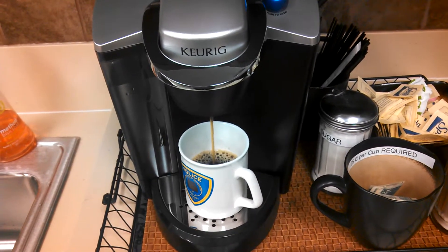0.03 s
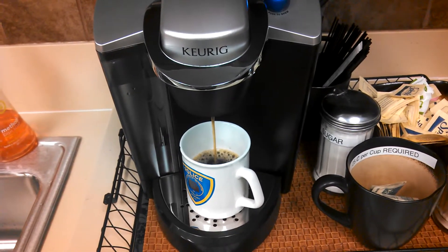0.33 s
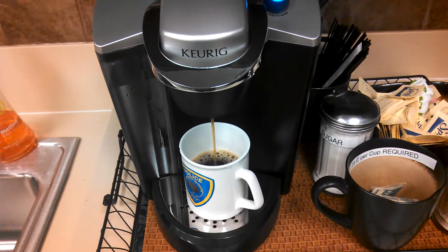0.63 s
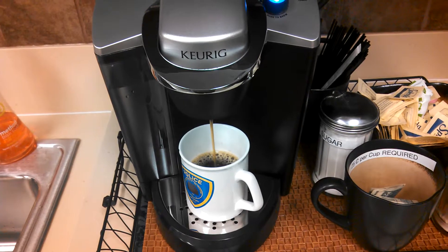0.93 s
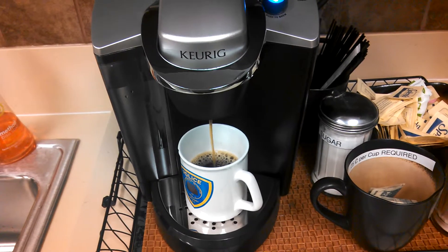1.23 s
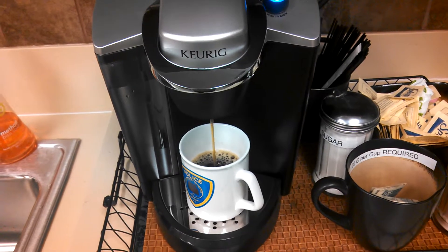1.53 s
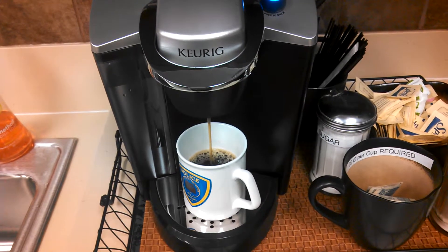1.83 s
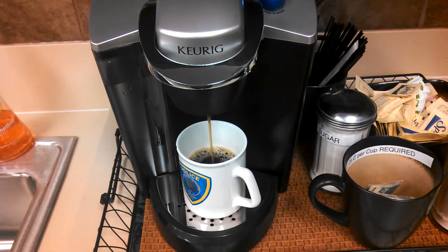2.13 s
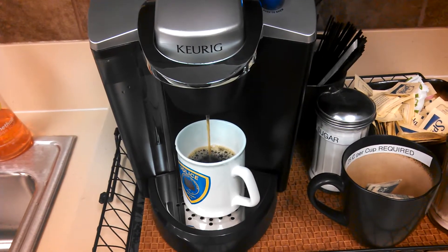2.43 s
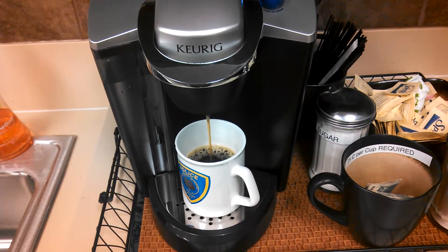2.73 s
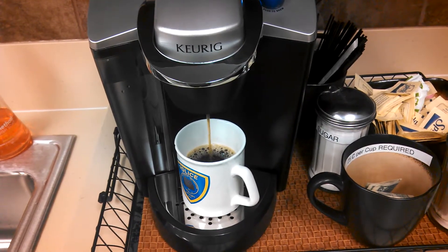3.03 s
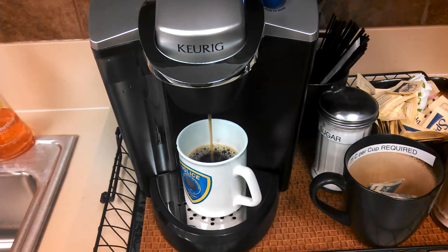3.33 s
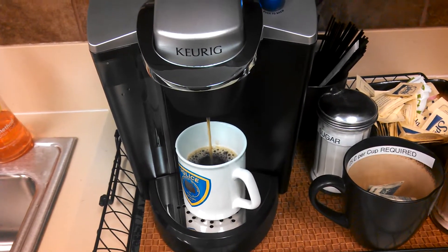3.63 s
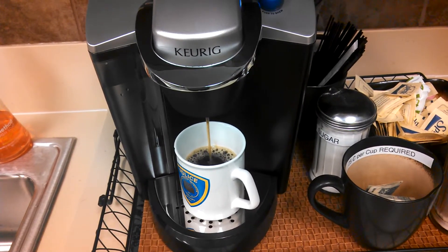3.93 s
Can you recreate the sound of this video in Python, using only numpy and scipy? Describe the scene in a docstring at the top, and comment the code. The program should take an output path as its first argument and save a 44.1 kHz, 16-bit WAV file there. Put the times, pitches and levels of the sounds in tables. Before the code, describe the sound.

Coffee dribbles into a partly filled mug, heard close up on a kitchen counter. Small bubbles plop and fizz throughout, turning briefly deeper late in the pour, over the coffee maker's low hum and a dull room rush.

```python
"""On a kitchen counter, a thin stream of coffee falls from a brewer into a half-full mug.
Drops trap air bubbles, which oscillate freely: large ones plop, small ones plink, and late in the
pour deeper ones gurgle. Impacts excite the air modes of the mug; the foam fizzes and bursts in
sharp ticks. The brewer's recess and the kitchen reflect these sounds. Underneath, the machine
hums over the dull rush of the room."""
import sys
import numpy as np
from scipy import signal
from scipy.fft import rfft, irfft, next_fast_len
from scipy.io import wavfile

SR = 44100
rng = np.random.default_rng(int(sys.argv[2]) if len(sys.argv) > 2 else 0)


def log_audio(samples):
    """Write samples as a 16-bit WAV file to the path given in sys.argv[1]."""
    # one column per channel
    frames = np.atleast_2d(samples).T
    # limit to full scale, then quantise
    limited = np.clip(frames, -1, 1)
    pcm = np.round(limited * 32767).astype(np.int16)
    wavfile.write(sys.argv[1], SR, pcm)


N = 176400
TIME = np.arange(N) / SR


def from_db(db):
    """Amplitude grows tenfold for every 20 dB."""
    return 10 ** (np.asarray(db) / 20)


def unit_rms(x):
    """Normalisation to unit mean power."""
    return x / np.sqrt(np.mean(x ** 2) + 1e-20)


def drift(hz):
    """Low-passed noise gives a slow random fluctuation of rms 1."""
    step = 40  # samples between values
    pole = np.exp(-2 * np.pi * hz * step / SR)
    slow = signal.lfilter([1], [1, -2 * pole, pole * pole], rng.standard_normal(N // step + 2002))[2000:]
    return np.interp(np.arange(N) / step, np.arange(len(slow)), unit_rms(slow))


def colour(x, curve, size=2048):
    """Minimum-phase filtering: folding the cepstrum makes a gain curve (f/Hz, gain/dB) causal."""
    hz, db = np.transpose(curve)
    grid_hz = np.maximum(np.arange(size + 1) * SR / (2 * size), 1)
    gain = from_db(np.interp(np.log(grid_hz), np.log(hz), db))
    cepstrum = irfft(np.log(gain))
    cepstrum[1:size] *= 2
    cepstrum[size + 1:] = 0
    return signal.fftconvolve(x, irfft(np.exp(rfft(cepstrum))))[:len(x)]


def noise(curve):
    """Filtered white noise takes the spectrum of its filter; the rms is 1."""
    return unit_rms(colour(rng.standard_normal(N + SR), curve)[SR:])


def add(out, start_s, sound):
    """Superposition: a short sound adds to those already present."""
    i = int(np.clip(start_s * SR, 0, N - 1))
    out[i:i + len(sound)] += sound[:N - i]


# Phase lead of the left side over the right: f/Hz, phase/rad
LEFT_LEAD = [(0, -2.8), (300, -1.1), (570, -2.4), (800, -.6), (1400, 0), (2100, 1.1), (2500, 3),
             (2800, 3.15), (13900, 28.3), (14600, 31.4)]

def left_of(x):
    """Phase difference: each frequency reaches the left side with its own shift."""
    size = next_fast_len(N + SR)
    spectrum = rfft(x, size)
    lead = np.interp(np.arange(len(spectrum)) * SR / size, *np.transpose(LEFT_LEAD))
    return irfft(spectrum * np.exp(1j * lead), size)[:N]


# Tones of the machine: f/Hz, level/dB, wavering share (0-1)
HUM_TONES = [(60.2, -52.5, 0.14), (119.2, -42.5, 0.07), (256, -50.5, 1), (316.7, -48, 0.89),
             (414.2, -54.5, 0.86), (582.4, -47.5, 0.99), (707.3, -55, 0.87)]

def hum(left_db=-3, swell_hz=326):
    """Forced vibration: mains and pump tones waver in level and phase; the middle ones swell once."""
    out = np.zeros((2, N))
    swell_db = 9 * np.exp(-((TIME - 2.27) / 0.19) ** 2)  # greatest at 2.27 s
    for hz, db, waver in HUM_TONES:
        lead = np.interp(hz, *np.transpose(LEFT_LEAD))
        modulation = np.sqrt(2 * (1 - waver ** 2)) + waver * (drift(9.6) + 1j * drift(6.5))
        level = db + swell_db * np.exp(-(2 * np.log2(hz / swell_hz)) ** 2)
        tone = from_db(level) * modulation * np.exp(2j * np.pi * (hz * TIME + rng.random()))
        out += np.real([from_db(left_db) * tone * np.exp(1j * lead), tone])
    return out


# Spectral density of the room's air noise: f/Hz, relative level/dB
RUSH_SPECTRUM = [(25, -31), (45, -9.5), (170, -0.5), (310, -3.5), (460, -6), (520, -9.5), (620, -6),
                 (800, -17), (3000, -44)]

def rush(level_db=-38.5, left_db=-3, coherence=0.85):
    """Partial coherence: the two sides share most of the kitchen's dull air noise."""
    right = noise(RUSH_SPECTRUM)
    left = coherence * left_of(right) + np.sqrt(1 - coherence ** 2) * noise(RUSH_SPECTRUM)
    return from_db(level_db) * np.array([from_db(left_db) * left, right])


# Vigour of the small splashing between the drops: t/s, relative level/dB
SPLASH_VIGOUR = [(0, -1), (.66, -5.5), (1.1, -1.5), (1.52, -7.5), (1.97, -3), (2.45, -7.5), (2.9, -1.5),
                 (3.2, -2), (3.65, -6.5), (4, -0.5)]

def splashing_db(times):
    """Amplitude envelope common to the faint sounds of the pour."""
    return np.interp(times, *np.transpose(SPLASH_VIGOUR))


# Spectral density of the foam's fizz: f/Hz, relative level/dB
FIZZ_SPECTRUM = [(500, -6), (1000, 19.5), (1900, 12.5), (2400, 10.5), (4400, 3.5), (5900, -1), (7500, -3),
                 (15400, -2), (16100, -33)]

def fizz(base_db=-51):
    """Amplitude-modulated noise: the foam's fine fizz rises and falls with the splashing."""
    return from_db(base_db + 0.5 * splashing_db(TIME) + 0.5 * drift(4.5)) * noise(FIZZ_SPECTRUM)


def scatter(per_s, base_db, spread_db, low_hz=1, high_hz=1):
    """A Poisson process of faint events whose levels follow the splashing: t/s, level/dB, f/Hz."""
    gap, size, pitch = rng.random((3000, 3)).T
    times = np.cumsum(-np.log(1 - gap)) / per_s
    levels = base_db + spread_db * np.minimum(-np.log(1 - size), 3.6) + splashing_db(times)
    hz = low_hz * (high_hz / low_hz) ** pitch
    return np.column_stack([times, levels, hz])[times < N / SR]


def bubbles(rows, cycles, glide=0.1, onset_cycles=0.5):
    """Damped oscillation: each bubble swells, then decays 60 dB over `cycles` as its pitch creeps up."""
    out = np.zeros(N)
    for start_s, db, hz in rows:
        periods = np.arange(int(cycles / hz * SR)) * hz / SR
        onset = 1 - np.exp(-(periods / onset_cycles) ** 2)
        envelope = onset * np.exp(-np.log(1000) * periods / cycles)
        phase = 2 * np.pi * periods * (1 + glide * periods / cycles)
        add(out, start_s, from_db(db) * envelope / envelope.max() * np.sin(phase))
    return out


def ring(impulses, hz, t60):
    """Impulse response of one mode: a unit impulse starts a decaying sine of amplitude 1."""
    pole, angle = from_db(-60 / (t60 * SR)), 2 * np.pi * hz / SR
    return signal.lfilter([0, np.sin(angle)], [1, -2 * pole * np.cos(angle), pole ** 2], impulses + 1e-18)


# Drops that trap a large bubble: t/s, relative peak level/dB, f/Hz
LARGE_BUBBLES = [(0.0992, -16.5, 1280), (0.1052, -22, 1290), (0.1264, -15.5, 1144), (0.1486, -32, 1360),
                 (0.1935, -27, 1270), (0.1994, -37, 1380), (0.2104, -20, 1290), (0.2688, -28, 1270),
                 (0.3694, -18.5, 1230), (0.3863, -29, 1390), (0.4184, -24, 1460), (0.5285, -31.5, 1220),
                 (0.6714, -23, 1230), (0.6986, -23.5, 1080), (0.7092, -37, 1370), (0.7286, -20.5, 1450),
                 (0.7876, -30.5, 1440), (0.9299, -23, 1100), (0.9448, -24, 1370), (0.9669, -27, 1370),
                 (0.9876, -18, 1280), (1.0922, -19.5, 1560), (1.1064, -28, 1220), (1.1649, -27, 1350),
                 (1.193, -24.5, 1490), (1.3406, -22, 1230), (1.3491, -29, 1100), (1.4013, -23.5, 1514),
                 (1.8963, -26, 1500), (1.9288, -20.5, 1430), (2.1605, -23.5, 1350), (2.5553, -26.5, 1130),
                 (2.5764, -19.5, 1180), (2.6007, -18.5, 1520), (2.6624, -27.5, 1770), (2.8946, -22.5, 1470),
                 (2.9087, -25, 1400), (3.0206, -30.5, 1830), (3.1274, -24, 1240), (3.1865, -26.5, 1290),
                 (3.242, -24, 1820), (3.2593, -23, 1480), (3.4745, -23.5, 1010), (3.5638, -23.5, 1260),
                 (3.6881, -28.5, 1383), (3.726, -21, 1370), (3.8058, -30, 1370), (3.8907, -28, 1370),
                 (3.9964, -22, 1350)]
# Air modes of the mug and the recess around it: f/Hz, level re the drop/dB, T60/s
MUG_MODES = [(890, -33.5, 0.015), (1390, -15, 0.026), (1943, -11.5, 0.032), (2565, -13.5, 0.024),
             (3500, -16, 0.0028)]

def plops(bubble_db=1.5, knock_spread_db=2):
    """Resonance: trapped bubbles pulsate, and each impact also excites the air modes of the mug."""
    faint = scatter(per_s=70, base_db=-38, spread_db=2.48, low_hz=896, high_hz=1900)
    out = from_db(bubble_db) * (bubbles(LARGE_BUBBLES, cycles=9.3) + bubbles(faint, cycles=24))
    times, drop_db, _ = np.vstack([LARGE_BUBBLES, faint]).T
    onsets = np.clip((times * SR).astype(int), 0, N - 1)
    for hz, mode_db, t60 in MUG_MODES:
        chance_db = knock_spread_db * rng.standard_normal(4000)[:len(onsets)]
        knocks = np.zeros(N)
        knocks[onsets] = from_db(drop_db + mode_db + chance_db)
        out += ring(knocks, hz, t60)
    return signal.sosfilt(signal.butter(2, 600, "high", fs=SR, output="sos"), out)


# Small trapped bubbles: t/s, relative peak level/dB, f/Hz
SMALL_BUBBLES = [(0.109, -26.5, 3230), (0.1992, -27, 3300), (0.478, -38.5, 4070), (0.5286, -35, 3650),
                 (0.9876, -24.5, 3660), (1.1748, -32.5, 3300), (1.368, -32, 4170), (1.6296, -38, 3670),
                 (2.601, -32, 4380), (2.8953, -26.5, 3300), (3.4745, -28, 4070), (3.9552, -35, 3950)]

def plinks(gain_db=2):
    """A bubble's natural frequency varies inversely with its radius: small ones ring high and briefly."""
    faint = scatter(per_s=40, base_db=-45, spread_db=2.3, low_hz=2250, high_hz=5020)
    return from_db(gain_db) * bubbles(np.vstack([SMALL_BUBBLES, faint]), cycles=17)


# Bursting foam films: t/s, relative level/dB
FOAM_BURSTS = [(0.1264, -34), (0.2102, -34), (0.2657, -33), (0.2835, -39), (0.4172, -28), (0.6533, -36),
               (1.0927, -27.5), (1.2476, -35.5), (1.3404, -31), (1.673, -39), (1.8764, -30), (1.929, -33),
               (1.9903, -30.5), (2.3116, -37.5), (2.5486, -31), (2.5767, -32), (2.602, -30),
               (2.7199, -23.5), (3.1871, -24), (3.3396, -30.5), (3.3573, -43), (3.3946, -27.5),
               (3.4748, -28), (3.4861, -29), (3.5481, -34), (3.7262, -22.5), (3.8058, -27), (3.9699, -32.5)]
# Spectral shape of a burst: f/Hz, gain/dB
BURST_SPECTRUM = [(1500, 5), (4300, 12), (5900, 2.5), (7200, 16.5), (12500, 14), (14000, 14.5), (15250, 20),
                  (16200, -38)]

def ticks(t60=0.0047):
    """A short transient has a broad spectrum: each foam film snaps in a bright burst of noise."""
    snaps, t = np.zeros(N), np.arange(600) / SR
    decay = np.exp(-np.log(1000) * t / t60)
    faint = scatter(per_s=45, base_db=-45, spread_db=2.05)[:, :2]
    grains = rng.standard_normal((3100, len(t)))
    for (start_s, db), grain in zip(np.vstack([FOAM_BURSTS, faint]), grains):
        add(snaps, start_s, from_db(db) * 0.5 * np.tanh(grain) * decay)
    return colour(snaps, BURST_SPECTRUM)


def gurgle(start_s=3.05, end_s=3.6):
    """Light damping: for a while the stream drives deeper, longer-ringing bubbles under."""
    rows = scatter(per_s=65, base_db=-41.5, spread_db=1.2, low_hz=711, high_hz=1163)
    times = rows[:, 0]
    return bubbles(rows[(times > start_s) & (times < end_s)], cycles=55)


def echoes(x, t60, delay_s):
    """Reverberation: dense reflections form an exponentially decaying response of unit energy."""
    t = np.arange(SR // 2) / SR
    tail = rng.standard_normal(len(t)) * np.exp(-np.log(1000) * t / t60) * (t > delay_s)
    return signal.fftconvolve(x, tail / np.sqrt(np.sum(tail ** 2)))[:N]


# Reflections from the kitchen: f/Hz, level re the direct sound/dB
WALL_REFLECTIONS = [(1400, -11), (2300, -17)]

def scene(recess_db=-8, left_db=-1.5):
    """Direct and reverberant fields of the pour superpose on the hum and rush: (left, right)."""
    pour = fizz() + plops() + plinks() + gurgle() + ticks()
    near = pour + from_db(recess_db) * echoes(pour, t60=0.013, delay_s=0.0023)
    reflected = colour(pour, WALL_REFLECTIONS)
    kitchen = np.array([echoes(reflected, t60=0.17, delay_s=0.0042) for side in range(2)])
    return np.array([from_db(left_db) * left_of(near), near]) + kitchen + hum() + rush()


def record(dry, cutoff_hz=16600):
    """Band limiting: an elliptic low-pass filter cuts the highest treble steeply."""
    return signal.sosfilt(signal.ellip(10, 0.2, 80, cutoff_hz, fs=SR, output="sos"), dry)


dry = scene()
out = record(dry)
log_audio(out)
```